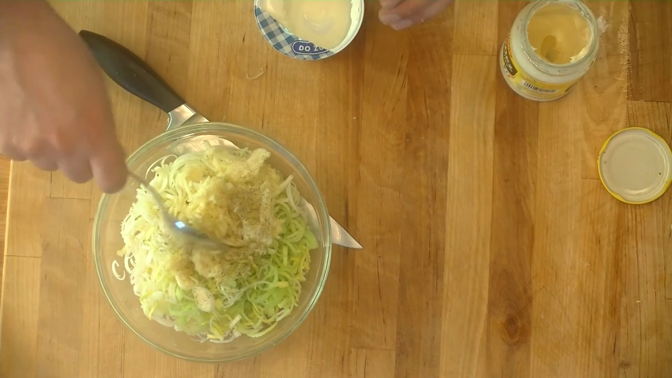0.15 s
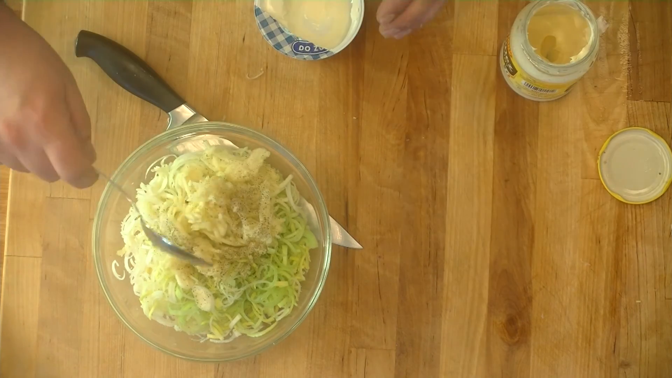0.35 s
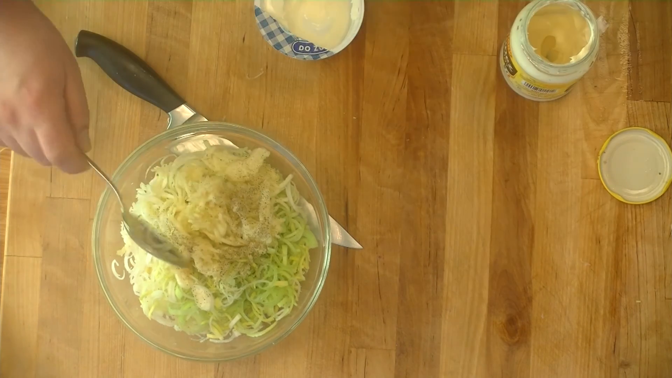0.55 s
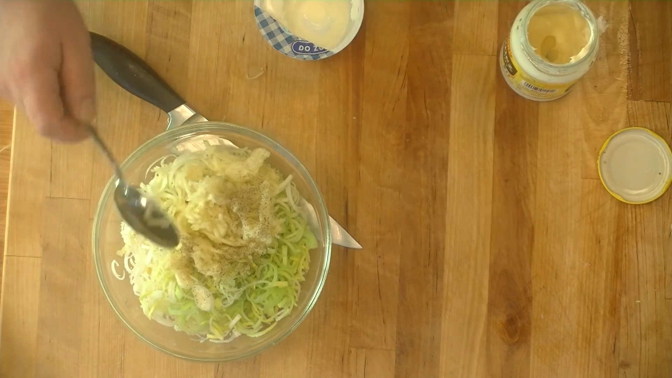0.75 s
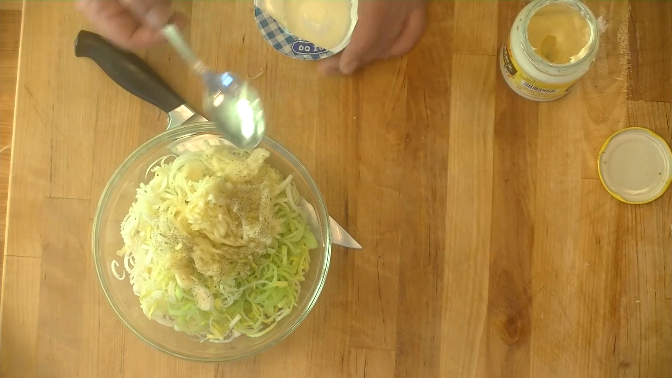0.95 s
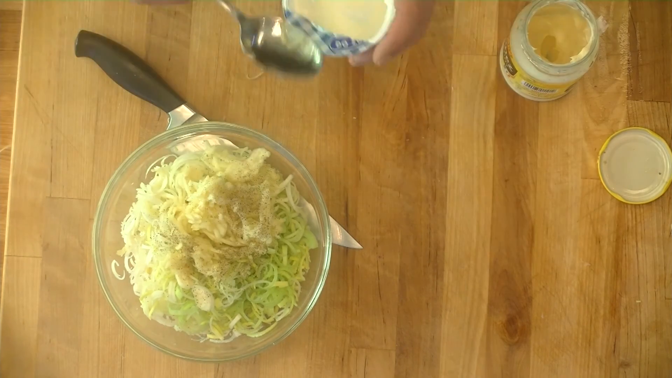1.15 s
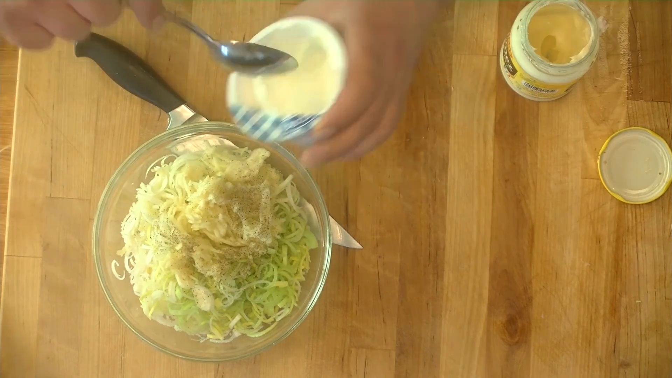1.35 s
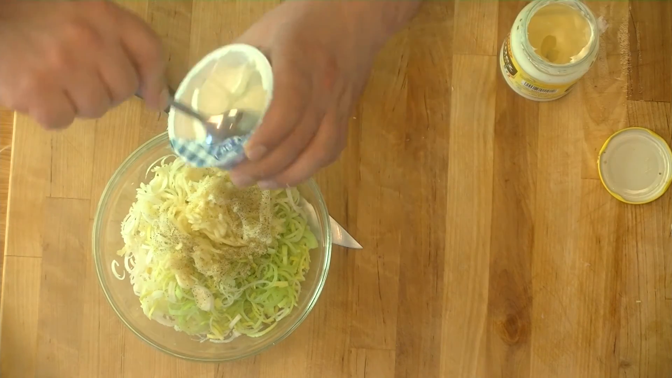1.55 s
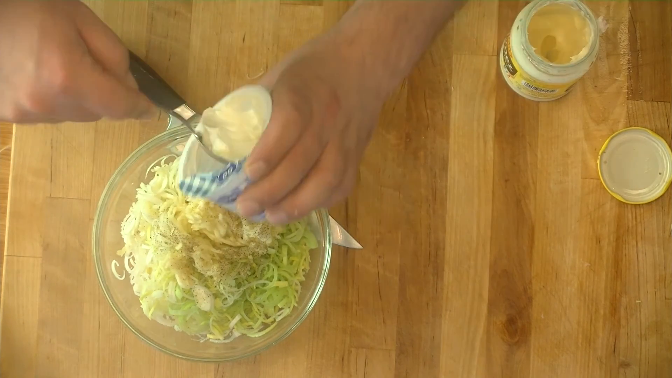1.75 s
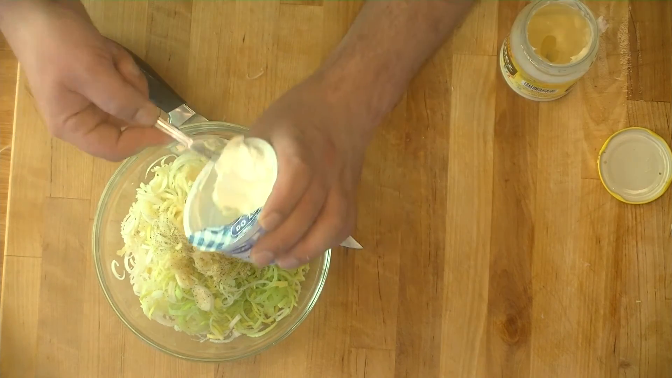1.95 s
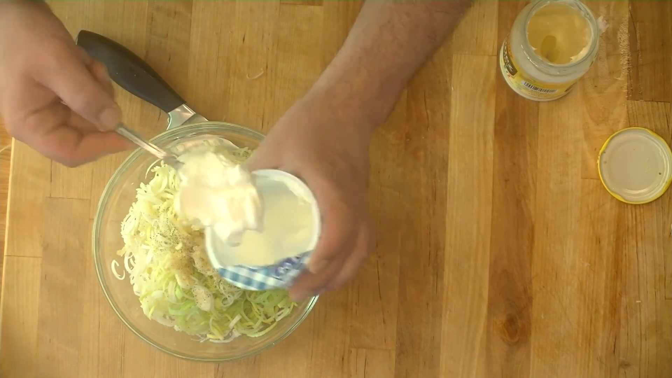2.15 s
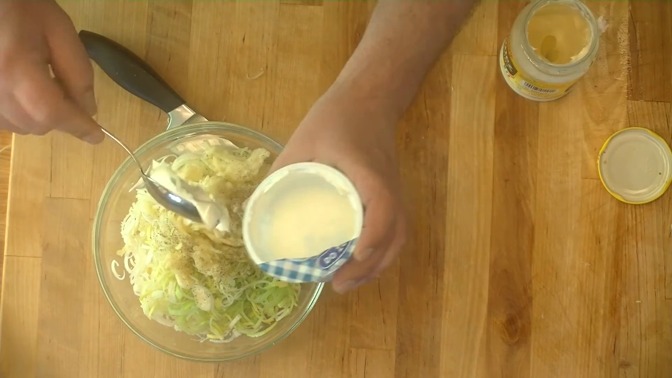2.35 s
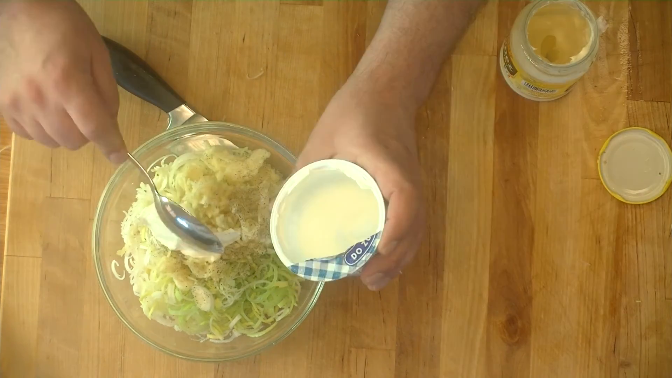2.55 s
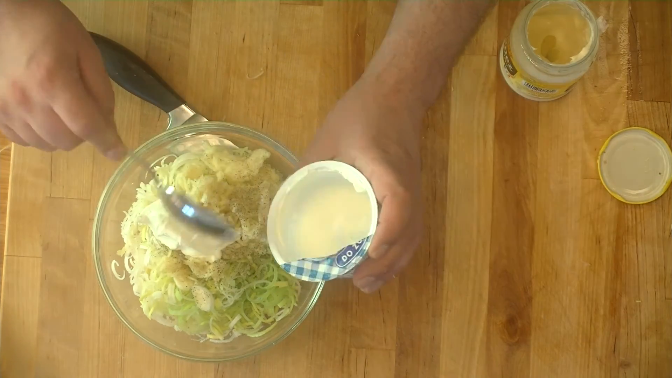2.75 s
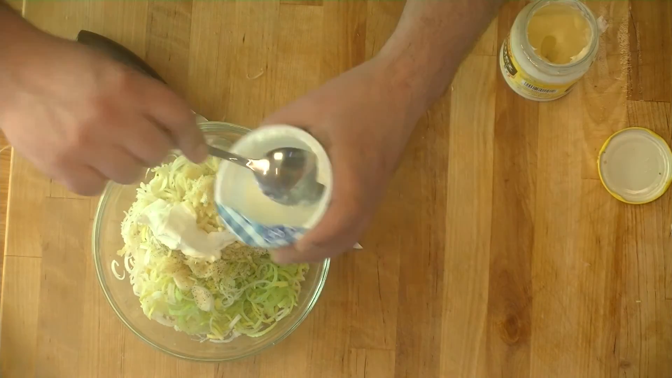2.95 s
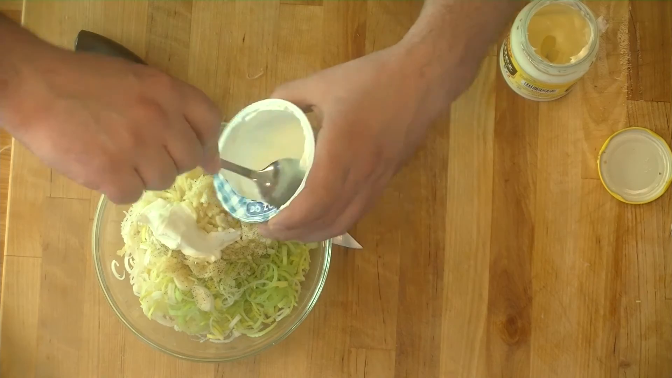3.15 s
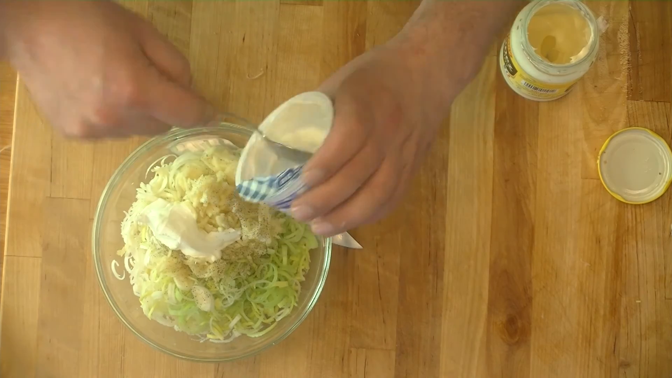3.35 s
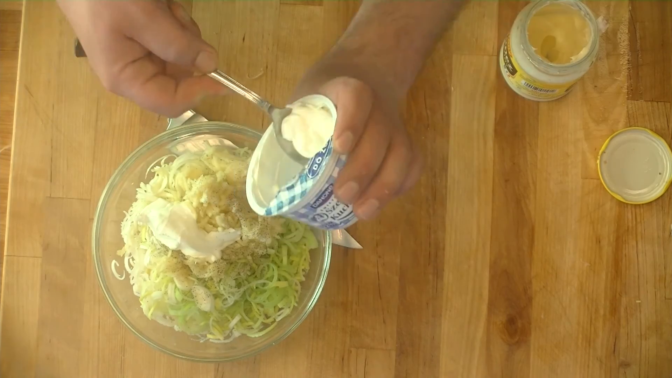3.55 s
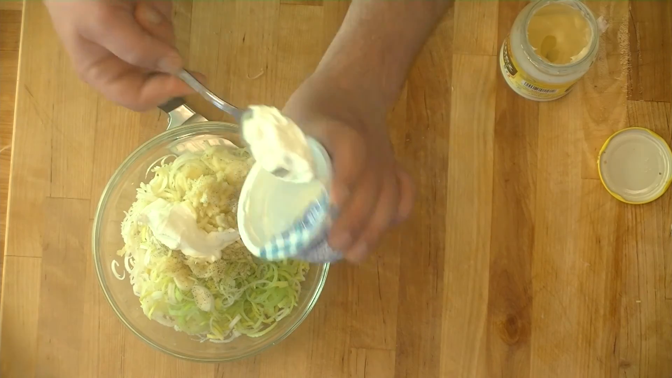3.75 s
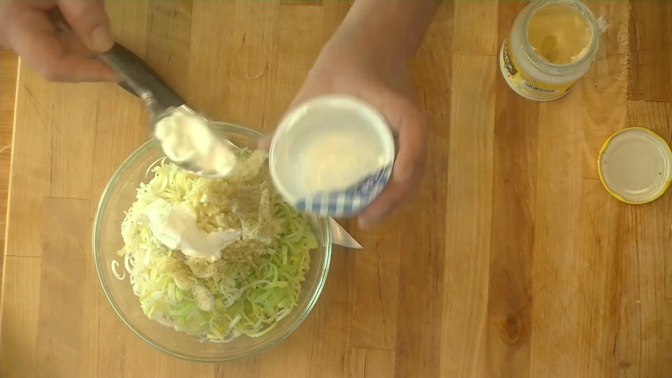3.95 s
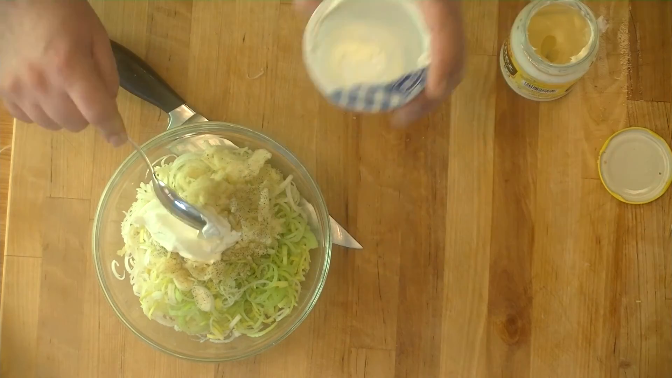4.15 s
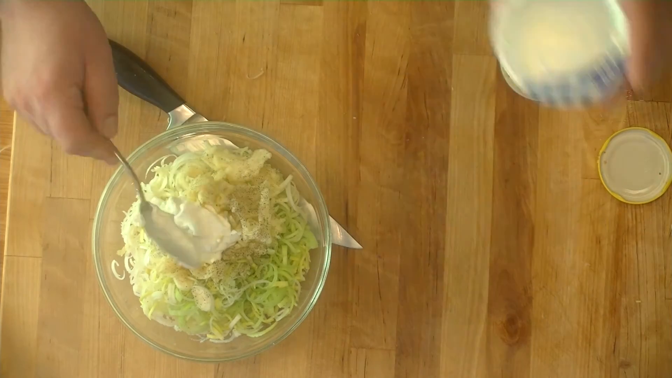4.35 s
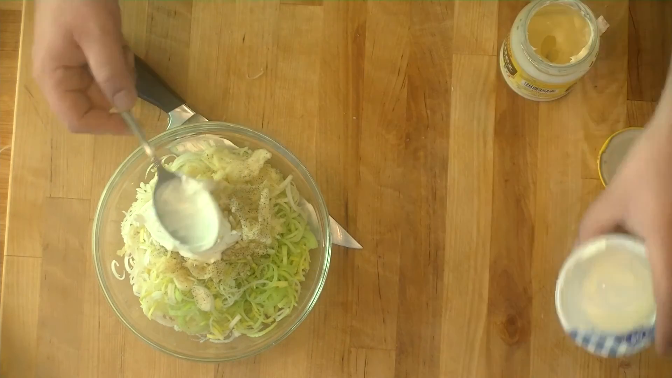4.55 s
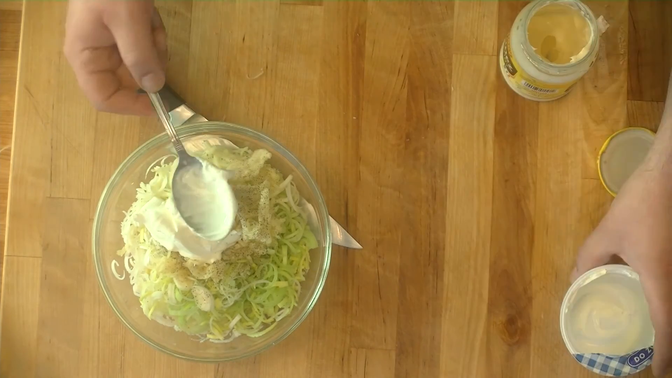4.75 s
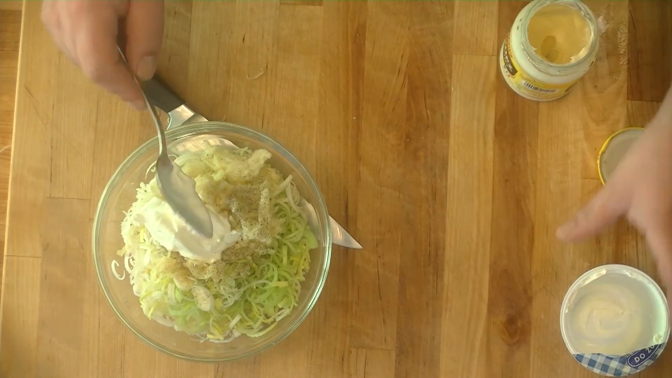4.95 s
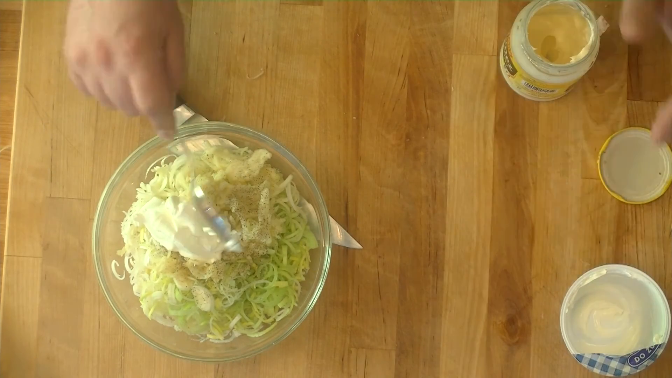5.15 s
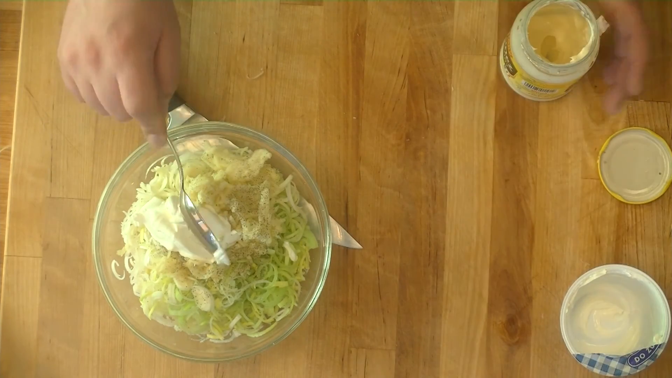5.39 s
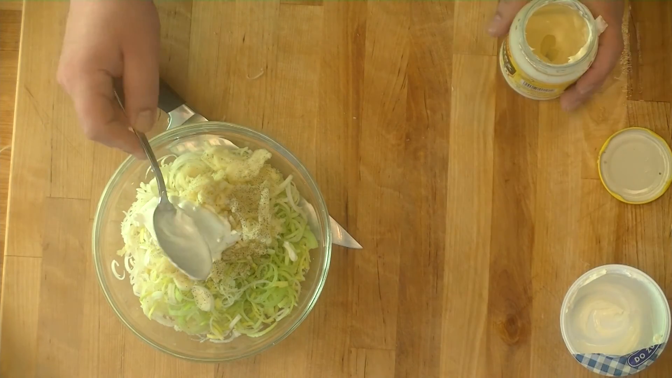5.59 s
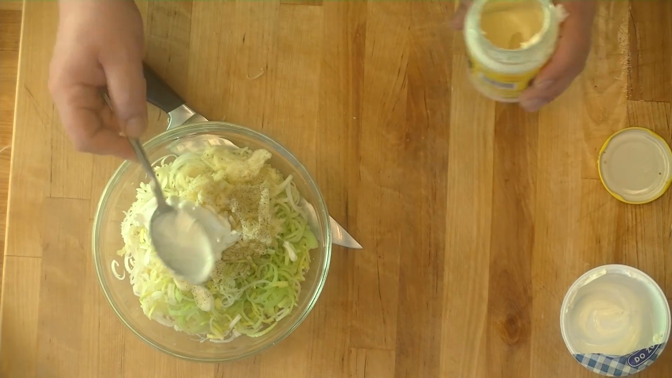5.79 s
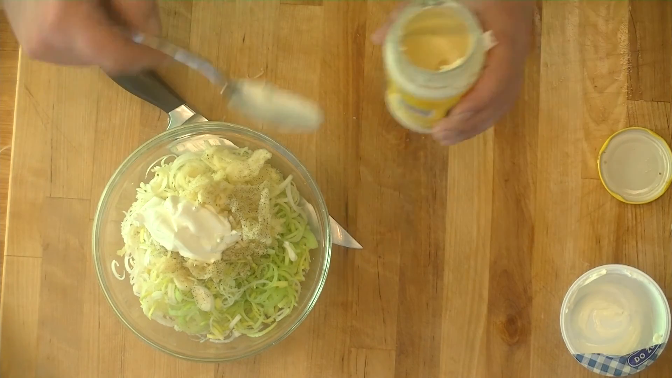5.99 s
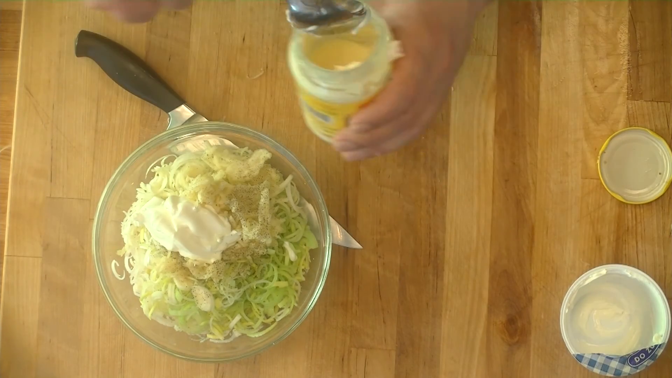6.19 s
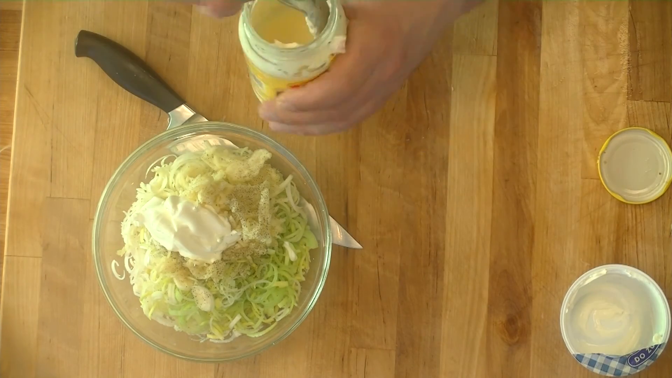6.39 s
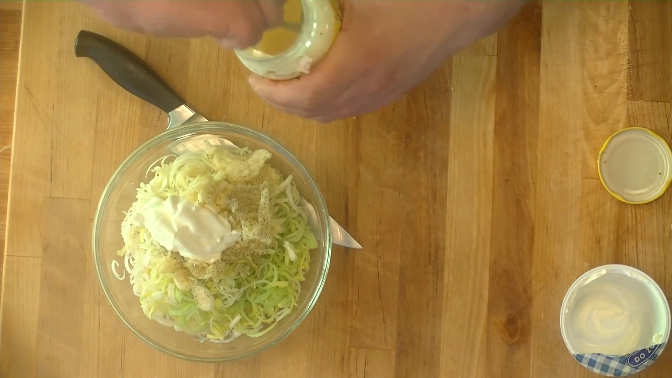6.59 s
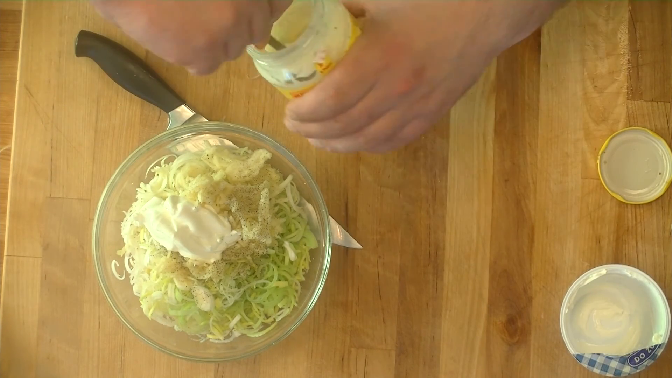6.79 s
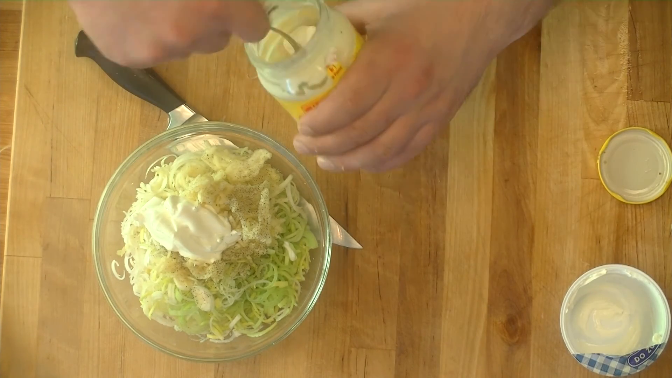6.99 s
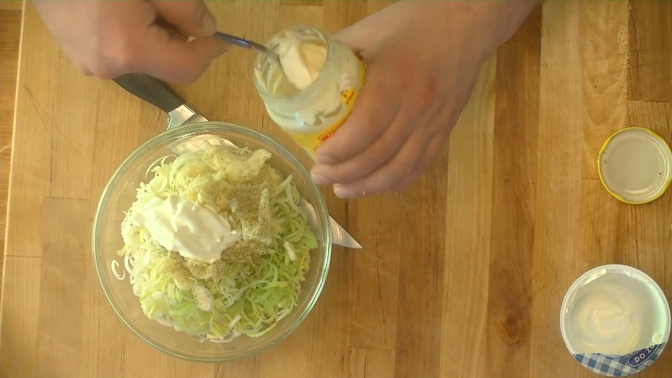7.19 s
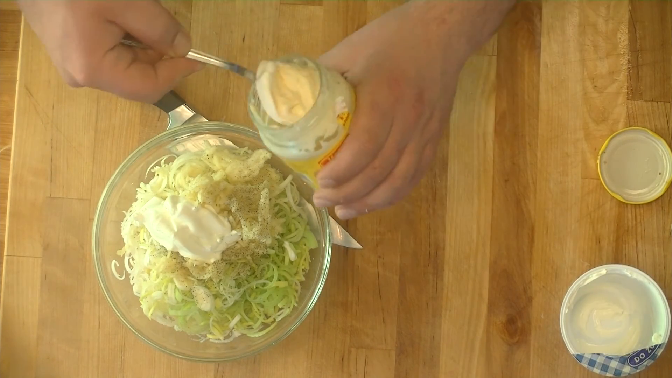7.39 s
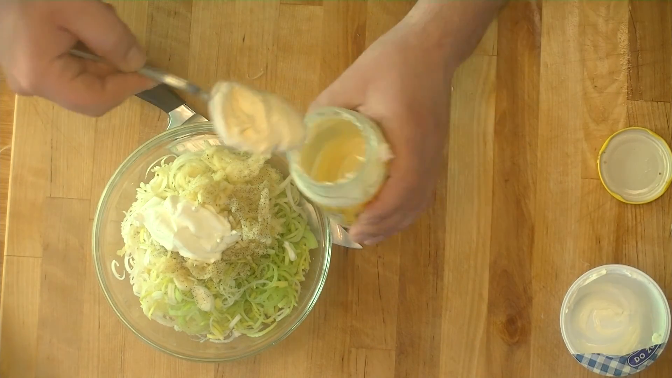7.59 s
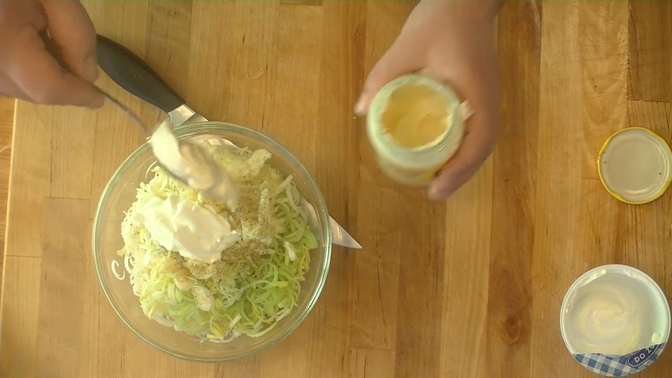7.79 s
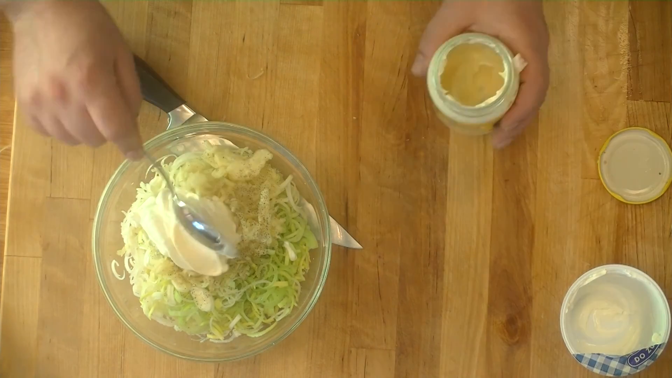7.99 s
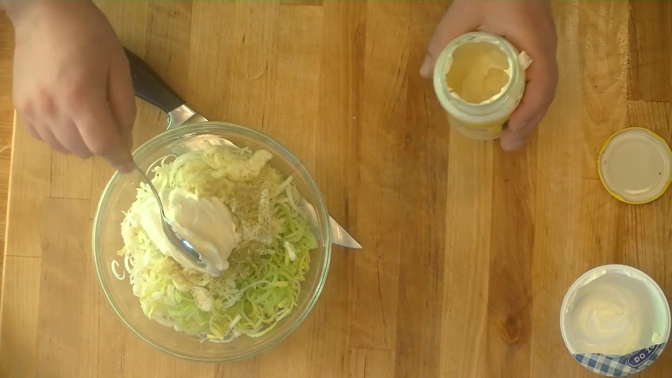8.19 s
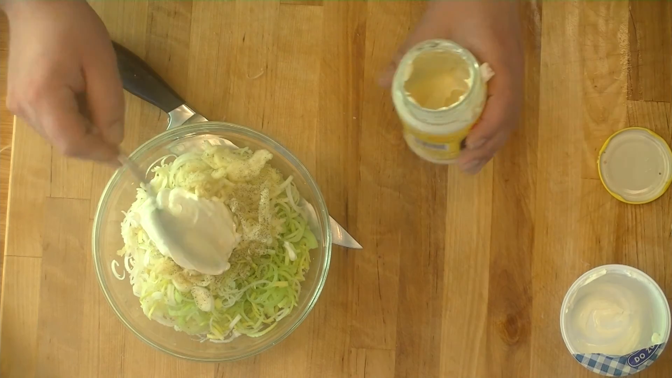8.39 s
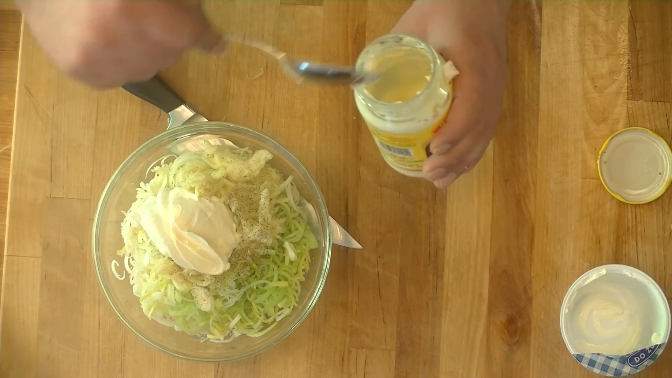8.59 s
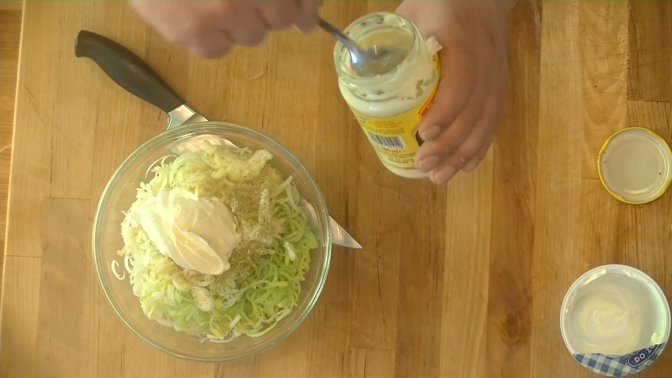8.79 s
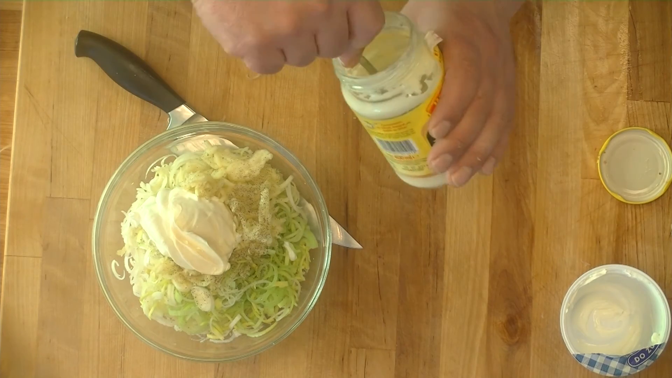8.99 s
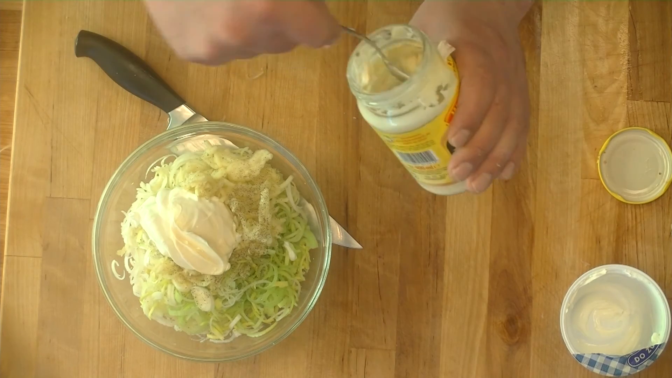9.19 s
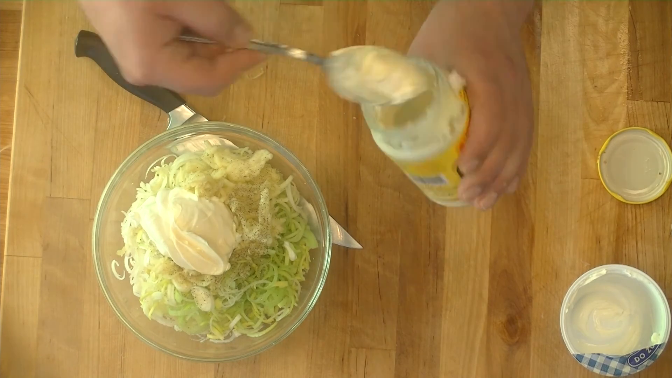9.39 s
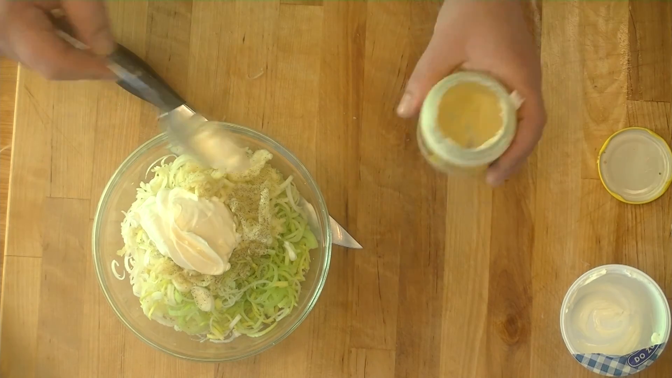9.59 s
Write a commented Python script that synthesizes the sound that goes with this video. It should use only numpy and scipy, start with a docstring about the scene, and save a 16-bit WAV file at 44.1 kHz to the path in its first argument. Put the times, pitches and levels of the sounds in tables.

```python
"""A steel spoon clinks on a glass salad bowl, scoops cream from a plastic tub and wipes it onto shredded cabbage.
The tub is set down on the wooden counter; then the spoon clatters and squeaks inside a glass jar of dressing.
Struck bodies are sums of damped modes with a burst of noise; rubbing and tearing are shaped noise; squeaks are
gliding harmonics. A hard-walled kitchen answers every contact, over a soft hiss and a thin electronic whine.
A limiter holds down the loudest clinks."""
import sys
import numpy as np
from scipy import signal
from scipy.fft import rfft, irfft, next_fast_len
from scipy.io import wavfile
from scipy.ndimage import uniform_filter1d, minimum_filter1d, map_coordinates

SR = 44100
rng = np.random.default_rng(int(sys.argv[2]) if len(sys.argv) > 2 else 0)


def dump_mix(stems):
    """Bounce the given channels to the path in sys.argv[1] as a 16-bit WAV at rate SR."""
    frames = np.atleast_2d(stems).T  # one column per channel
    limited = np.clip(frames, -1, 1)  # hard clip at full scale
    pcm = np.round(limited * 32767).astype(np.int16)
    wavfile.write(sys.argv[1], SR, pcm)


N = 425124
T = np.arange(int(.8 * SR)) / SR  # time within one contact [s]
TIME = np.arange(N) / SR  # time within the scene [s]

# All levels in the tables are relative.
# Steady room noise. Each row: frequency in Hz, density in dB per Hz.
HISS_SPECTRUM = [(15, -58), (25, -17), (43, -8.5), (70, -13), (161, -8), (270, -4), (317, -6), (394, -3),
                 (516, -2), (754, -2.5), (1130, -4.5), (1330, -9), (1940, -11), (13600, -22.5),
                 (16000, -23)]
# Stereo width of that noise. Each row: frequency in Hz, side minus mid in dB.
HISS_WIDTH = [(60, -24), (110, -10), (200, -9), (380, -6), (700, -8.5), (1290, -5.5), (2380, -6.5),
              (4400, -8.5), (8120, -9.5), (15000, -45)]
HISS_DB, TOP_HZ = -46, 16000  # rms of the mid noise; band limit of the whole sound

# Reverberation of the room. Each row: frequency in Hz, t60 in seconds.
KITCHEN_DECAY = [(200, 0.52), (1000, 0.43), (3000, 0.52), (6000, 0.5), (10000, 0.36), (15000, 0.39)]
# Stereo width of the tail. Each row: frequency in Hz, side minus mid in dB.
TAIL_WIDTH = [(300, -21), (1000, -13), (2500, -7.5), (5000, -8), (9000, -7.5), (13000, -33)]

# Spoon on the bowl's rim. Each row: start in seconds, ring in dB, crack in dB.
BOWL_HITS = [(.058, -38, -28), (.571, -17, -7.5), (.577, -8, -3), (.592, -14, -9), (.630, -14, -20)]
# The bowl's modes, some in close pairs because the glass is not quite round.
# Each row: frequency in Hz, level in dB, t60 in seconds.
BOWL_MODES = [(508, -23, .6), (635, -21, .4), (1298, -8, .58), (2370, -4.5, .5), (3441, -9, .4),
              (3658, 0.5, .44), (5086, -4, .3), (5134, -2, .54), (6720, -6, .38), (8472, -10, .28),
              (8620, -8, .3), (8718, -9, .25), (8830, -3, .32), (8902, -8, .25), (9345, -14, .28),
              (10376, -8, .27), (11422, -15, .27), (11610, -18, .25), (12411, -16, .25), (12990, -14, .23)]
# Crack of the rim. Each row: frequency in Hz, level in dB.
RIM_CRACK = [(150, -12.5), (400, -2.5), (900, 5), (1800, 4), (3500, -1.5), (6000, -6.5), (8700, 0),
             (10000, -1), (13000, -8), (16000, -21)]

# The spoon presses into the salad. Each row: peak in seconds, rise in seconds, fall in seconds, squish in dB.
PRESSES = [(.12, .06, 0.21, -40), (.35, 0.17, 0.18, -43), (4.41, 0.08, 0.068, -36.5),
           (4.512, 0.021, 0.044, -29.5), (4.58, .08, 0.18, -42.5)]
# The spoon drags through the cream in the tub.
# Each row: peak in seconds, rise in seconds, fall in seconds, hiss in dB, tub wall in dB.
SCOOPS = [(1.53, .05, 0.22, -35.5, -33), (1.78, 0.35, 0.41, -37.5, -54), (3.215, 0.062, 0.084, -27, -31),
          (3.439, 0.31, 0.35, -32.5, -35), (3.75, 0.053, 0.061, -33, -27),
          (3.95, 0.045, 0.09, -41.5, -59.5)]
# Bubbles tearing in the cream. Each row: frequency in Hz, level in dB per Hz.
CREAM_SPECTRUM = [(880, -7), (1500, -18), (1840, -17.5), (2310, -11), (2830, -11.5), (3060, -13),
                  (5720, -9.5), (6500, -11), (12300, -17.5), (15500, -33)]
STROKE_DROP_DB = 20  # weakening one rise before and one fall after the peak of a stroke
STROKE_ROUNDNESS = 1.26  # 1 = pointed, 2 = bell

# The tub slides into the hand. Each row: peak in seconds, rise in seconds, fall in seconds, hiss in dB.
SLIDES = [(1.05, .12, .12, -44), (1.27, 0.17, 0.28, -42.5)]
# Plastic sliding. Each row: frequency in Hz, level in dB per Hz.
RUB_SPECTRUM = [(1000, -25), (3000, -7), (5500, -1), (10000, 0.5), (12500, -16)]

# Spoon knocking on the plastic tub. Each row: start in seconds, body in dB, main frequency in Hz, click in dB.
TUB_HITS = [(1.505, -24.5, 1125, -29), (1.534, -8.5, 1160, -14.5), (1.535, -15, 722, -24),
            (2.978, -36, 810, -25.5), (3.027, -13, 569, -19), (3.043, -22.5, 472, -35),
            (3.226, -11, 1122, -22.5), (3.244, -19.5, 484, -35)]
# The tub's modes. Each row: multiple of the main frequency, level in dB, t60 in seconds.
TUB_MODES = [(.64, -6.5, .03), (.85, -2, .04), (1, 2.5, .045), (1.12, -2, 0.037), (1.32, -10, 0.023),
             (1.58, -11.5, 0.041), (2.1, -9.5, 0.038), (3.398, -26, 0.013)]
# Click of struck plastic. Each row: frequency in Hz, level in dB.
PLASTIC_CLICK = [(200, -16), (500, -14), (1200, 5), (2500, 12), (5000, 9), (9000, 2), (15000, -13)]
# The tub is set down and rocks to rest on the counter.
SET_DOWN_S, SET_DOWN_DB, SET_DOWN_HZ, SET_DOWN_CLICK_DB = 4.69, -4.5, 960, -20
ROCK_GAP_S, ROCK_LENGTH_S = .0215, .15  # mean gap; time to weaken by 20 dB
ROCK_DETUNE = 0.063  # relative spread of the main frequency

# A dollop lands on the salad. Each row: frequency in Hz, level in dB, t60 in seconds.
PLOP_MODES = [(260, -1, 0.023), (350, -3, .02)]
PLOP_S, PLOP_DB = 2.366, -31

# The spoon's edge squeaks along the tub, later along the jar.
# Each row: start in seconds, length in seconds, start and end pitch in Hz, level in dB, overtones in dB.
SQUEAKS = [(3.195, 0.034, 4600, 5500, -28, -40), (3.202, 0.054, 1037, 1174, -20.5, -29),
           (6.672, 0.04, 2970, 2995, -28, 13), (7.444, 0.091, 2700, 2930, -26, -20),
           (7.485, 0.046, 1840, 1880, -34.5, -19), (8.962, 0.043, 3210, 3225, -29.5, 13.5),
           (8.963, 0.031, 3365, 3390, -24.5, -22), (8.963, 0.063, 1998, 1930, -29, -14),
           (9.079, 0.018, 2615, 2653, -12, -21), (9.065, 0.144, 1790, 1625, -31, -34),
           (9.238, 0.13, 2655, 2875, -18.5, -12)]

# Wet smacks as the spoon leaves the dressing; the row at 4.178 s is a loud wall echo of the first smack. Each
# row: start in seconds, snap in dB, pocket frequency in Hz, pocket in dB.
SMACKS = [(4.155, -24.5, 2540, -26), (4.163, -29, 2770, -28), (4.178, -24.5, 2610, -27),
          (4.297, -32, 2480, -44), (4.307, -39, 1090, -32), (4.407, -31.5, 600, -32.5),
          (7.994, -27.5, 1760, -38), (8.000, -16, 1740, -20.5)]
# Snap of the wet film. Each row: frequency in Hz, level in dB.
FILM_SNAP = [(400, -30), (1500, 3.5), (3000, 2), (6000, 4), (10000, 4.5), (15000, -5)]

# Spoon against the jar. Each row: start in seconds, crack in dB, ring in dB, brightness in dB,
# spoon frequency in Hz, air in dB, chatter (time to weaken by 20 dB) in seconds.
JAR_HITS = [(6.24, -4, -15, -9, 5010, -28, 0.11), (6.377, -5.5, -20.5, 7.5, 4980, -29.5, .02),
            (6.675, -1, -17, 1, 5550, -22, 0.1), (7.212, -5.5, -18.5, -9.5, 4640, -21, 0.021),
            (7.487, -7.5, -27, -4.5, 5350, -23.5, 0.023), (8.755, -10, -18.5, -4.5, 5510, -17.5, 0.023),
            (8.838, -9, -21.5, 0.5, 5400, -34.5, .015), (8.962, -3.5, -26, 14, 6420, -20, .01),
            (9.041, -19, -22.5, -1, 5630, -56, .01), (9.079, -11, -25.5, -11, 5590, -55, .03),
            (9.163, -9, -26, 0, 6100, -36, 0.016), (9.236, -1.5, -13, -9, 5460, -15, 0.08)]
# Jar and spoon ringing together, damped by the hand and the dressing.
# Each row: frequency in Hz, level in dB, t60 in seconds.
JAR_MODES = [(2084, -20, 0.053), (2575, -1.5, 0.016), (2614, -11, 0.065), (2733, -9, 0.081),
             (2777, -7.5, 0.037), (2970, -14.5, 0.031), (3273, -10.5, .052), (3460, -13, 0.067),
             (4125, -8, 0.021), (4370, -7, 0.021), (4840, -2.5, 0.038), (5040, -9.5, 0.11),
             (5460, 5.5, 0.024), (5590, 6, 0.018), (5995, -19, 0.27), (7130, -21, .12), (7455, -7, .065),
             (8530, 12, 0.044), (8940, -9, .05), (9480, 13, 0.046), (9250, 12.5, 0.043), (9740, 7, 0.17),
             (12600, 2, .1), (13150, 2, .06)]
# The air in the jar, lower the more its mouth is covered. Each row: time in seconds, frequency in Hz.
JAR_AIR = [(6.24, 616), (6.75, 603.5), (7.21, 491.3), (7.30, 473), (7.485, 434), (7.56, 559), (8.75, 560.5),
           (9.18, 552), (9.24, 528), (9.33, 459)]
# Crack of steel on the jar. Each row: frequency in Hz, level in dB.
JAR_CRACK = [(150, -49), (450, -11.5), (1000, -1.5), (1600, -6), (2700, -0.5), (3900, -4), (5400, -1),
             (7200, -7.5), (9300, -0.5), (11000, -7.5), (13000, -27), (16000, -24)]
CHATTER_GAP_S = .0175  # mean gap between the spoon's rebounds
MIDDLE_DB = 4.5  # the middle modes answer best


def amp(db):
    """Level and amplitude: 20 dB are a factor of ten."""
    return 10 ** (np.asarray(db) / 20)


def unit(x):
    """Normalisation to an rms of 1."""
    return x / np.sqrt(np.mean(x ** 2) + 1e-20)


def along(points, hz):
    """Interpolation of (Hz, value) points on a logarithmic frequency axis."""
    f, v = np.transpose(points)
    return np.interp(np.log(hz + 1), np.log(f + 1), v)


def fade(t60):
    """Exponential decay: 60 dB lost in t60 seconds."""
    return np.exp(-np.log(1000) * T / np.maximum(t60, 1e-3))


def wobble(rate, size):
    """Smooth random modulation: a spline through random knots, rate of them a second."""
    knots = rng.standard_normal(int(size * rate / SR) + 4)
    return map_coordinates(knots, [np.arange(size) * rate / SR])


def filtered(x, response):
    """Linear filtering: the spectrum times a response of frequency."""
    n = x.shape[-1]
    m = next_fast_len(n + 4096)
    return irfft(rfft(x, m) * response(np.fft.rfftfreq(m, 1 / SR)), m)[..., :n]


def noise(spectrum, size):
    """Coloured noise: white noise shaped by a spectrum, rms 1."""
    return unit(filtered(rng.standard_normal(size), lambda hz: amp(along(spectrum, hz))))


def burst(spectrum, t60):
    """Impact noise: a short, decaying crack of coloured noise."""
    return noise(spectrum, len(T)) * fade(t60)


def ring(modes):
    """Modal superposition: damped sines, each a little stronger or weaker at every blow."""
    total = 0
    for hz, db, t60 in modes:
        strength = amp(db + rng.normal(0, 0.5)) * rng.choice([-1, 1])
        total = total + strength * fade(t60) * np.sin(2 * np.pi * hz * T)
    return total


def rebounds(gap_s, length_s, scatter, count):
    """Repeated impact as (delay s, dB): nearly even gaps, 20 dB weaker after length_s."""
    gaps = np.abs(gap_s * (1 + scatter * rng.standard_normal(count)))
    return [(delay, -20 * delay / max(length_s, 1e-3)) for delay in np.cumsum([0, *gaps])]


def stroke(s, rise_s, fall_s, db):
    """Envelope of one movement of the hand: the gain swells to its peak at s and dies away."""
    away = np.clip(np.maximum((s - TIME) / rise_s, (TIME - s) / fall_s), 0, 4)
    return amp(db - STROKE_DROP_DB * away ** STROKE_ROUNDNESS)


def add(out, s, x):
    """Superposition: mix a stereo sound in at time s."""
    i = max(round(s * SR), 0)
    out[:, i:i + x.shape[1]] += x[:, :N - i]


def kitchen(x, wet_db, echo_s=.0233, echo_db=-7, counter_db=-11, low_cut_hz=210):
    """Room response: direct sound, quick bounces off the counter, one clear wall echo and a diffuse tail."""
    # small things radiate little bass
    x = signal.sosfilt(signal.butter(3, low_cut_hz, "high", fs=SR, output="sos"), x)
    hz, t, z = signal.stft(rng.standard_normal((2, len(T))), SR, nperseg=256)
    z = z * amp(-60 * t / along(KITCHEN_DECAY, hz)[:, None])
    z[1] *= amp(along(TAIL_WIDTH, hz))[:, None]
    buildup = 1 - np.exp(-T / 0.0099)
    tail = signal.istft(z, SR, nperseg=256)[1][:, :len(T)] * buildup
    mid, side = amp(wet_db) * tail / np.linalg.norm(tail[0])
    near, wall = rng.standard_normal((2, len(T))) * fade(np.array([[.012], [.003]]))
    mid += amp(counter_db) * near / np.linalg.norm(near)
    mid += amp(echo_db) * np.roll(wall, round(echo_s * SR)) / np.linalg.norm(wall)
    mid[0] += 1  # direct sound
    return signal.fftconvolve(x[None], np.array([mid + side, mid - side]), axes=1)[:, :len(x)]


def background(whine_db=-61):
    """Stationary noise: the steady noise of the room, with the thin whine of the electronics as a pure tone."""
    mid = noise(HISS_SPECTRUM, N)
    side = filtered(noise(HISS_SPECTRUM, N), lambda hz: amp(along(HISS_WIDTH, hz)))
    whine = amp(whine_db) * np.sin(2 * np.pi * 15625 * TIME)
    return amp(HISS_DB) * np.array([mid + side, mid - side]) + whine


def bowl(beat_db=3.6, wander=0.29, buzz=0.77, buzz_t60=0.83):
    """Modal ringing of glass: the spoon chatters on the rim and, grazing, roughens each mode, most at first."""
    out = np.zeros((2, N))
    for s, ring_db, crack_db in BOWL_HITS:
        glass = np.zeros(len(T))
        for hz, db, t60 in BOWL_MODES:
            # phase modulation in radians
            rough = wander * wobble(60.5, len(T)) + buzz * fade(buzz_t60) * wobble(298.0, len(T))
            level = amp(db + beat_db * wobble(47.9, len(T))) * fade(t60)
            glass += level * np.sin(2 * np.pi * (hz * T + rng.random()) + rough)
        glass *= 1 - np.exp(-T / 0.0022)  # soft onset
        crack = amp(crack_db - 4) * burst(RIM_CRACK, t60=.05)
        add(out, s, kitchen(amp(ring_db - 2) * glass, wet_db=-5, echo_db=-12, counter_db=-15))
        add(out, s, kitchen(crack, wet_db=2))
    return out


def crackle(grain_db, clump_db=2.0):
    """Granular noise: clumps of tiny bursts of uneven size."""
    level_db = grain_db * wobble(900, N) + clump_db * wobble(70, N)
    return unit(rng.standard_normal(N) * amp(level_db))


def shifting(x, patchy_db):
    """Time-varying filtering: the colour drifts in patches of random gain as the spoon changes its angle."""
    z = signal.stft(x, nperseg=512)[2]
    field = uniform_filter1d(rng.standard_normal(z.shape), size=7, axis=0)  # over frequency
    field = uniform_filter1d(field, size=12, axis=1)  # over time
    return signal.istft(z * amp(patchy_db * unit(field)), nperseg=512)[1][:len(x)]


def fizz(x):
    """Spectral shaping: the colour of tearing cream, rms 1."""
    spectrum = [(300, -38)] + list(CREAM_SPECTRUM)
    return unit(filtered(x, lambda hz: amp(along(spectrum, hz))))


def tub_wall(f):
    """Resonance: the response of two broad modes of the plastic wall."""
    total = 0
    for hz, width_hz, db in [(600, 200, 1.1), (1046, 170, 1.6)]:
        damping = 1j * f * width_hz
        total = total + amp(db) * damping / (hz * hz - f * f + damping)
    return total


def cream():
    """Bubble noise: countless small bubbles tear under the spoon; in the tub the wall hums along."""
    wall = unit(filtered(crackle(grain_db=2.5), tub_wall))
    drag = sum(stroke(*timing, hiss_db) for *timing, hiss_db, _ in SCOOPS)
    hum = sum(stroke(*timing, wall_db) for *timing, _, wall_db in SCOOPS)
    tearing = fizz(shifting(crackle(grain_db=2.5), patchy_db=2.2))
    scoop = amp(-3.5) * drag * tearing + amp(-12.0) * hum * wall
    press = amp(-3) * sum(stroke(*row) for row in PRESSES) * fizz(crackle(grain_db=4))
    return kitchen(scoop + press, wet_db=-5.5)


def slides():
    """Friction noise: the smooth tub gives a faint, high hiss as it is picked up."""
    movement = sum(stroke(*row) for row in SLIDES)
    return kitchen(amp(-3.5) * movement * noise(RUB_SPECTRUM, N), wet_db=-9.0)


def tub():
    """Modes of a thin shell: a hollow knock whose pitch depends on the grip and the place struck."""
    out = np.zeros((2, N))
    rocking = []
    for delay, db in rebounds(ROCK_GAP_S, ROCK_LENGTH_S, scatter=.06, count=5):
        hz = SET_DOWN_HZ * (1 + ROCK_DETUNE * rng.standard_normal())
        rocking.append((SET_DOWN_S + delay, SET_DOWN_DB + db, hz, SET_DOWN_CLICK_DB + db))
    for s, body_db, hz, click_db in list(TUB_HITS) + rocking:
        body = amp(body_db - 5.5) * ring(np.array(TUB_MODES) * [hz, 1, 1])
        knock = body + amp(click_db) * burst(PLASTIC_CLICK, t60=0.022)
        # little sound escapes below the lowest mode
        knock = signal.sosfilt(signal.butter(2, hz / 2, "high", fs=SR, output="sos"), knock)
        add(out, s, kitchen(knock, wet_db=-2.0))
    return out


def plop():
    """Heavily damped modes: the dollop lands with one soft, low push."""
    out = np.zeros((2, N))
    add(out, PLOP_S, kitchen(amp(PLOP_DB) * ring(PLOP_MODES), wet_db=-9))
    return out


def squeaks(rough=0.019, flutter_db=4):
    """Stick and slip of the steel edge: an unsteady tone with overtones."""
    out = np.zeros((2, N))
    for s, length, start_hz, end_hz, db, overtone_db in SQUEAKS:
        u = np.clip(T / length, 0, 1)  # progress of the squeak
        pitch = (start_hz + (end_hz - start_hz) * u) * (1 + rough * wobble(655, len(T)))
        phase = 2 * np.pi * np.cumsum(pitch) / SR
        overtones = np.sin(2 * phase) + np.sin(3 * phase) + np.sin(4 * phase) / 5
        tone = np.sin(phase) + amp(overtone_db) * overtones
        flutter = amp(flutter_db * wobble(256, len(T)))
        pressure = np.sqrt(1 - u) * (1 - np.exp(-8 * u)) * flutter
        add(out, s, kitchen(amp(db) * pressure * tone, wet_db=-4.5))
    return out


def smacks():
    """Film rupture and cavity resonance: a film of dressing snaps and a small air pocket rings."""
    out = np.zeros((2, N))
    for s, snap_db, hz, pocket_db in SMACKS:
        pocket = amp(pocket_db) * ring([(hz, 0, .016)])
        snap = amp(snap_db) * burst(FILM_SNAP, t60=0.019)
        add(out, s, kitchen(snap + pocket, wet_db=-1.5))
    return out


def chatter(x, length_s):
    """Repeated impact: the sound x again at every rebound of the spoon."""
    contacts = rebounds(CHATTER_GAP_S, length_s, scatter=.15, count=6)
    return sum(amp(db) * np.pad(x, (round(delay * SR), 0))[:len(x)] for delay, db in contacts)


def jar(detune=0.0047, spoon_db=4, spoon_t60=0.035, air_t60=0.24, crack_t60=0.027):
    """Modal excitation: each contact sets the spoon's pitch and tips the ring low or high; the jar's air hoots."""
    out = np.zeros((2, N))
    for s, crack_db, ring_db, bright_db, spoon_hz, air_db, chatter_s in JAR_HITS:
        modes = np.array(list(JAR_MODES) + [(spoon_hz, spoon_db, spoon_t60)])
        group = np.digitize(modes[:, 0], [3100, 7500])  # low, middle and high modes
        modes[:, 0] *= 1 + detune * rng.standard_normal(len(modes))  # the contact pulls each mode slightly
        group_levels = [-bright_db, MIDDLE_DB, bright_db]
        glass = sum(amp(db) * unit(ring(modes[group == k])) for k, db in enumerate(group_levels))
        glass = amp(ring_db - 23) * glass
        crack = amp(crack_db - 7.5) * burst(JAR_CRACK, crack_t60)
        air_hz = np.interp(s + T, *np.transpose(JAR_AIR))
        air = amp(air_db + 4) * fade(air_t60) * np.sin(2 * np.pi * np.cumsum(air_hz) / SR)
        add(out, s, kitchen(chatter(glass + crack, chatter_s), wet_db=-2.5))
        add(out, s, kitchen(air, wet_db=-9.0, echo_db=-20.5, counter_db=-5.5))
    return out


def scene():
    """Superposition of all sources."""
    contacts = bowl() + tub() + plop() + squeaks() + smacks() + jar()
    return background() + contacts + cream() + slides()


def record(dry, ceiling_db=-8.0, hold_s=0.0171):
    """Limiting: gain falls at the loudest clinks, slipping peaks are rounded, and the band ends at TOP_HZ."""
    level = np.sqrt(np.abs(uniform_filter1d(np.mean(dry ** 2, axis=0), size=130)))  # running rms
    need = np.minimum(1, amp(ceiling_db) / (level + 1e-9))
    hold = max(int(hold_s * SR), 128)
    held = minimum_filter1d(need, hold, origin=hold // 2 - 32)  # acts slightly ahead, then holds
    limited = dry * uniform_filter1d(held, size=64)
    rounded = limited / (1 + (limited / .92) ** 8) ** (1 / 8)
    return filtered(rounded, lambda hz: hz < TOP_HZ)


dry = scene()
out = record(dry)
dump_mix(out)
```